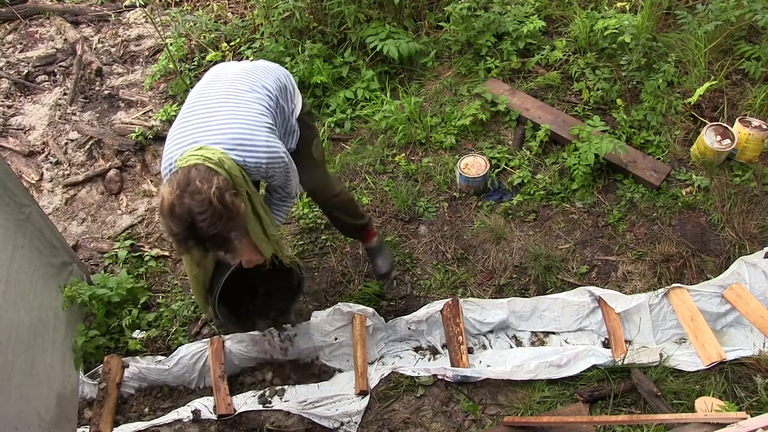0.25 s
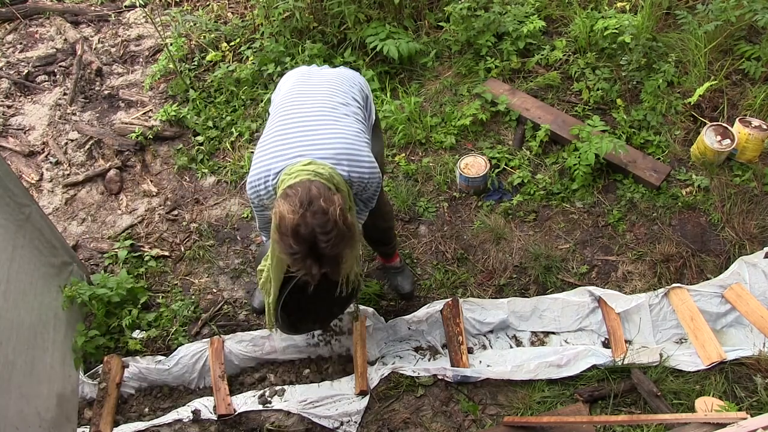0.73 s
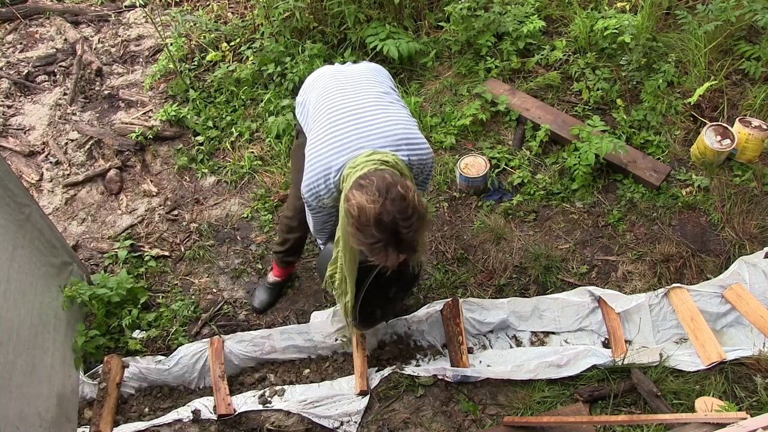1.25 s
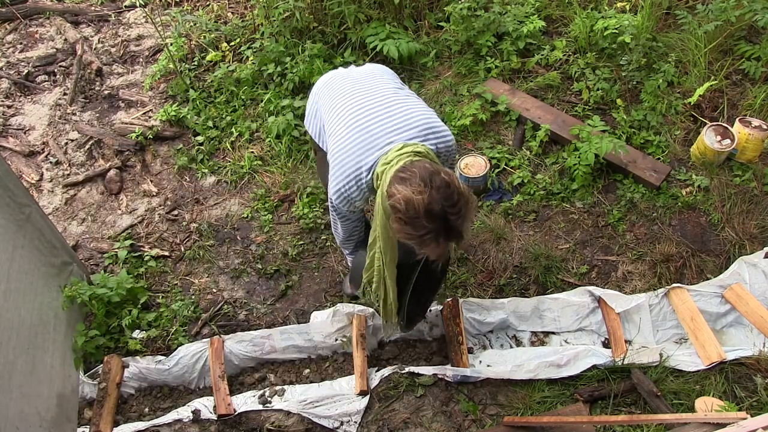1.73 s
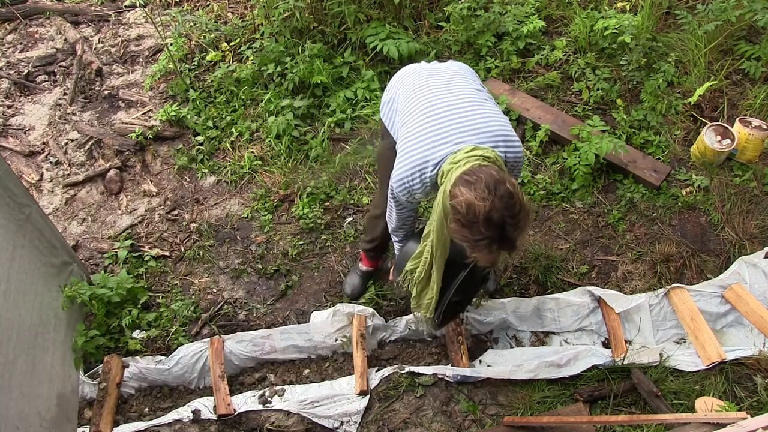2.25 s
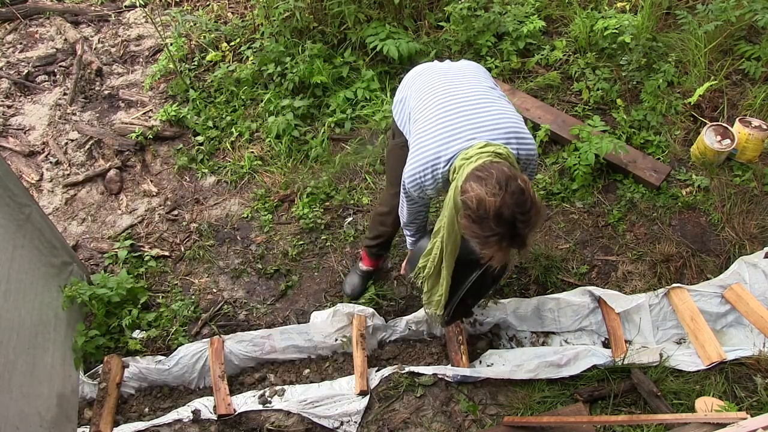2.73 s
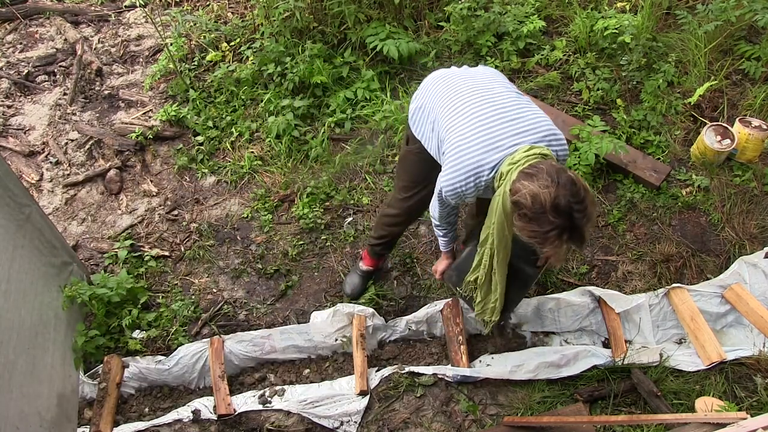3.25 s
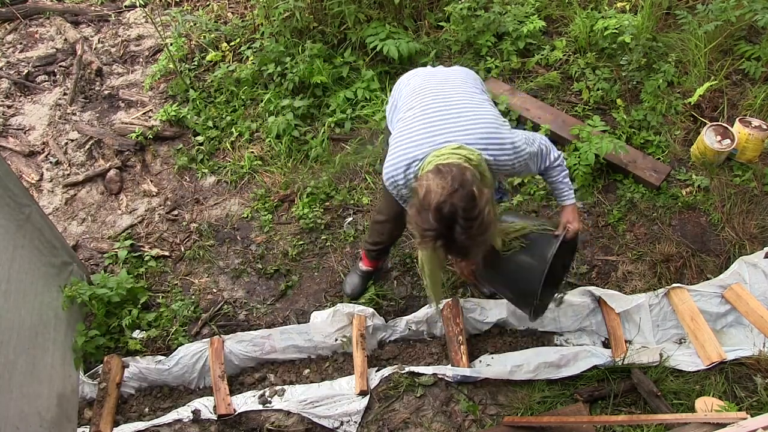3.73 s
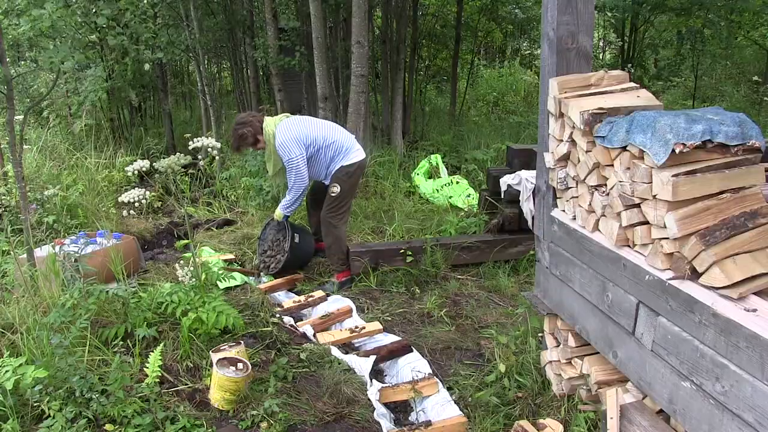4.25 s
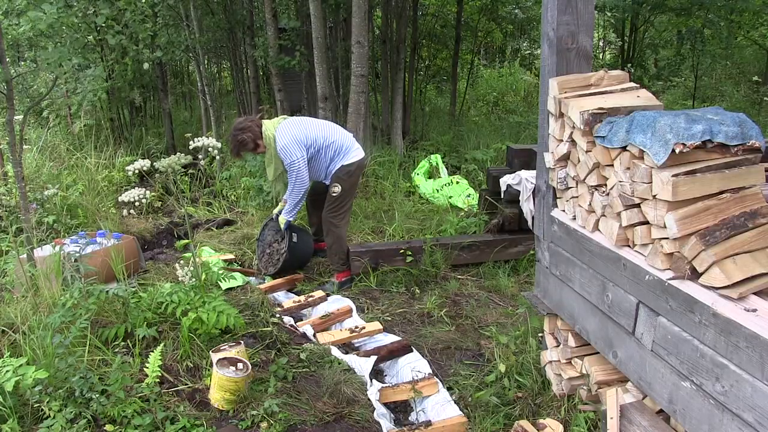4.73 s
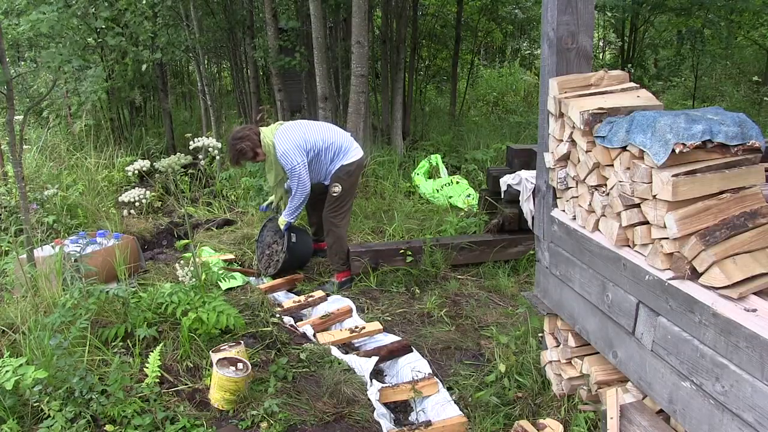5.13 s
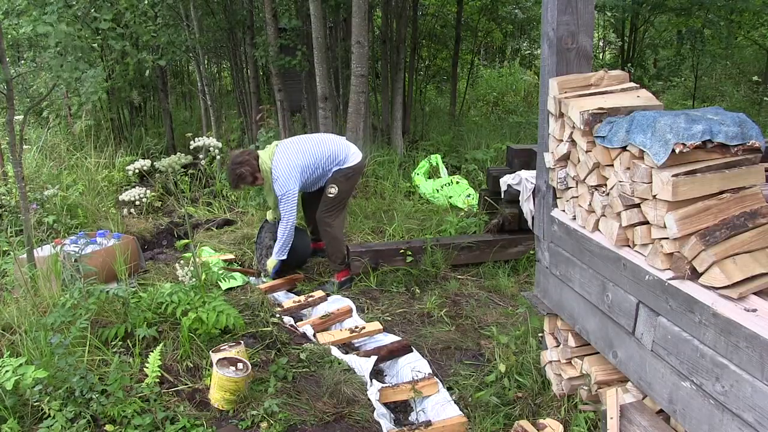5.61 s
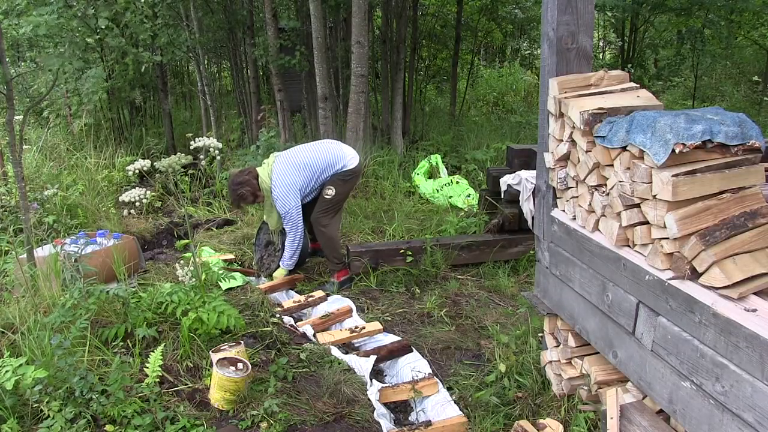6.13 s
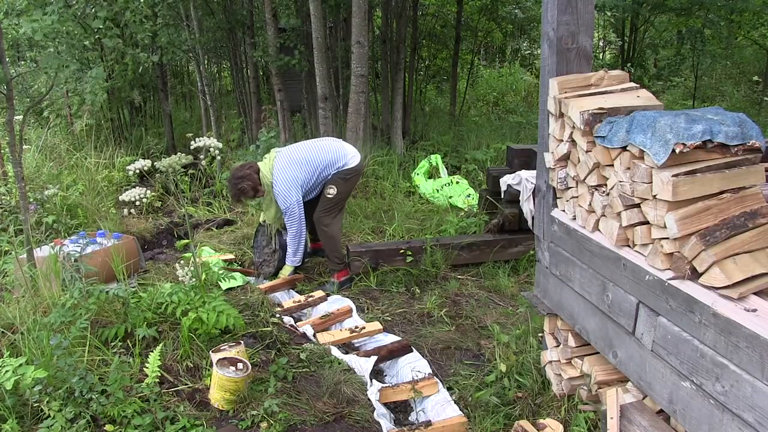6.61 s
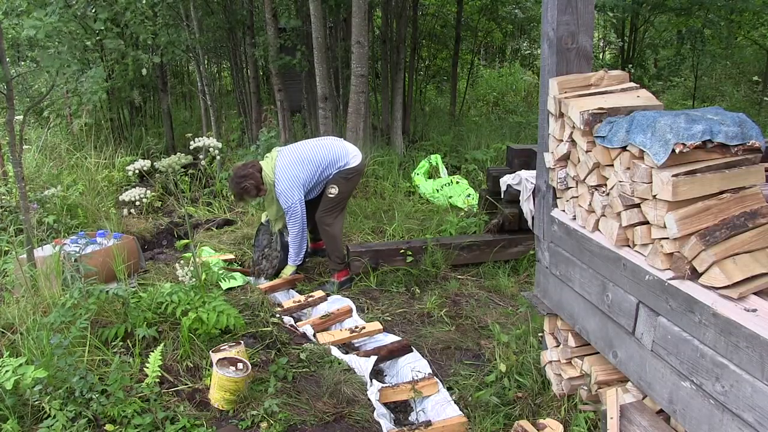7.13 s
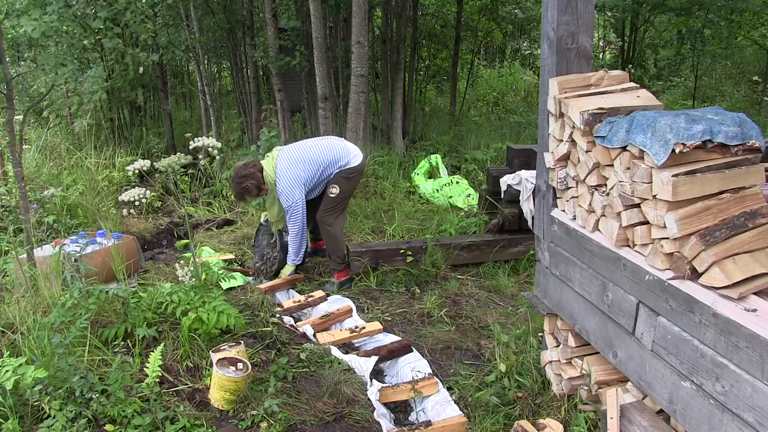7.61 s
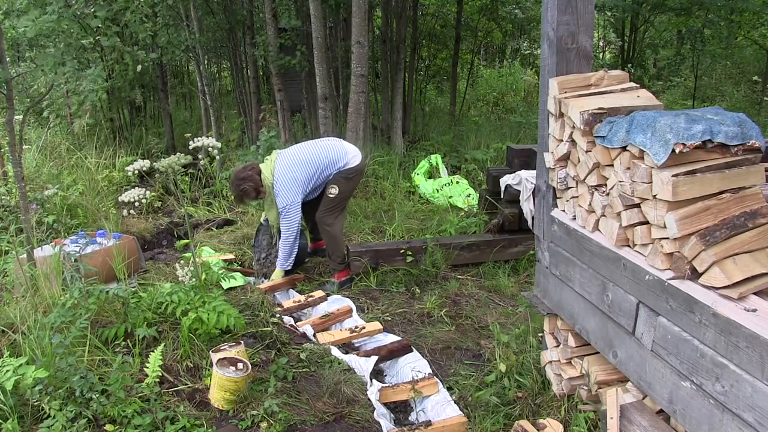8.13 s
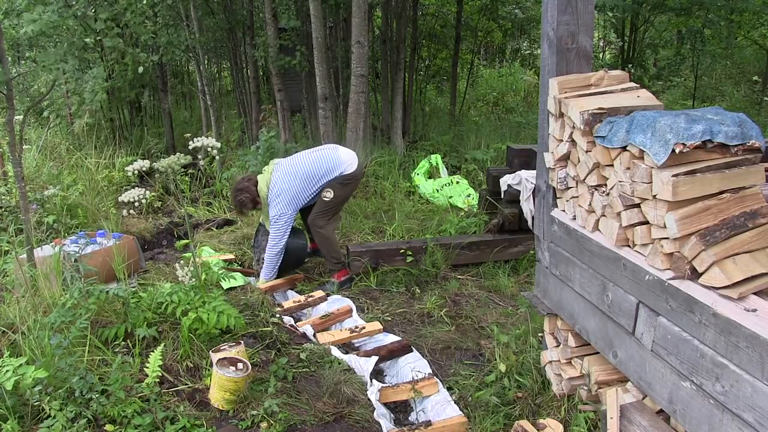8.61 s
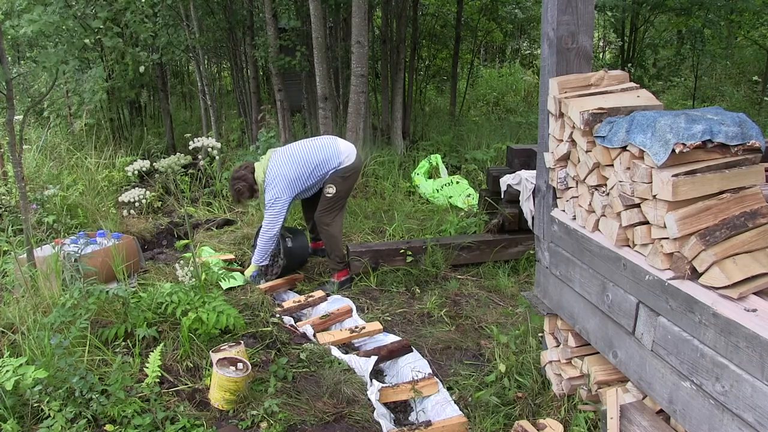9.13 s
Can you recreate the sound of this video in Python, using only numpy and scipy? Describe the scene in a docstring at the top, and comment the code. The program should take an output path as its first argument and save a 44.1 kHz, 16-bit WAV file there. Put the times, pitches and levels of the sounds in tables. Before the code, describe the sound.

Gritty rubble hisses from a bucket in quick surges with clacking stones, then knocks dully from across a windy garden, then sounds close again.

```python
"""Grit hisses out in surges while stones and brick lumps clack: rubble shaken from a bucket into a lined trench.
Heard from close above (bright), from across the garden (dull, knocking, windy), then close again.
Grit is noise and thousands of tiny damped sines under a surging level; stones are pitched rings with chatter
and a noise crack, soft lumps low thumps. Wind is shaped low noise; a thin treble hiss joins the last view."""
import sys
import numpy as np
from scipy import signal
from scipy.fft import rfft, irfft, next_fast_len
from scipy.io import wavfile
from scipy.ndimage import map_coordinates

SR = 44100
rng = np.random.default_rng(int(sys.argv[2]) if len(sys.argv) > 2 else 0)


def log_audio(samples):
    """Write samples as a 16-bit WAV file to the path given in sys.argv[1]."""
    # one column per channel
    frames = np.atleast_2d(samples).T
    # limit to full scale, then quantise
    limited = np.clip(frames, -1, 1)
    pcm = np.round(limited * 32767).astype(np.int16)
    wavfile.write(sys.argv[1], SR, pcm)


N = 413216


def amp(db):
    """Amplitude ratio of a level in dB."""
    return 10 ** (np.asarray(db) / 20)


def unit(x):
    """x scaled to rms 1."""
    return x / np.sqrt(np.mean(x ** 2) + 1e-20)


def along(points, hz):
    """Interpolate (frequency [Hz], value) points on a log frequency axis."""
    point_hz, value = np.transpose(points)
    return np.interp(np.log(hz + 1), np.log(point_hz + 1), value)


def curve(rows):
    """One value per sample from (time [s], value) rows."""
    return np.interp(np.arange(N) / SR, *np.transpose(rows))


def wobble(knots_per_s):
    """Smooth random curve through normally distributed knots."""
    knots = rng.standard_normal(N // 200)
    return map_coordinates(knots, [np.arange(N) * knots_per_s / SR])


def filtered(x, response):
    """x times a response of frequency [Hz]."""
    m = next_fast_len(N + SR // 2)
    return irfft(rfft(x, m) * response(np.fft.rfftfreq(m, 1 / SR)), m)[:N]


def coloured(x, points):
    """x shaped by (frequency [Hz], level [dB]) points, at rms 1."""
    return unit(filtered(x, lambda hz: amp(along(points, hz))))


def noise_decay(t60_s):
    """50 ms exponential envelope that falls 60 dB in t60_s."""
    return amp(-60 * np.arange(SR // 20) / SR / t60_s)


def by_view(near, far, last):
    """Each of the three places of listening has its own signal."""
    # the distant view: (start [s], end [s])
    far_view = (4.099, 8.585)
    t = np.arange(N) / SR
    return np.select([t < far_view[0], t < far_view[1]], [near, far], last)


def sizes(luck, spread_db):
    """Collision gains with exponentially distributed dB: most faint, a few stand out, capped at 16 dB."""
    return amp(np.minimum(-spread_db * np.log(1 - luck), 16))


def rings(start_s, hz, gain, cycles, size):
    """Damped sines of size samples, 60 dB down after their cycles; contact softens the onset."""
    hz = np.clip(hz, 100, SR / 2.5).reshape(-1, 1)
    turns = np.arange(size) / SR * hz
    decay = amp(-60 * turns / np.reshape(cycles, (-1, 1)))
    contact = 1 - np.exp(-turns / 0.42)
    wave = np.sin(2 * np.pi * turns) * decay * contact
    at = np.round(start_s * SR).astype(int).reshape(-1, 1) + np.arange(size)
    return np.bincount(at.ravel(), (gain.reshape(-1, 1) * wave).ravel(), N + SR)[:N]


def grains(count, low_hz, high_hz, cycles, spread_db, size):
    """Small collisions at random times and log-spread pitches; gain rises with pitch to flatten the spectrum."""
    when, pitch, luck = rng.random((count, 3)).T
    hz = low_hz * (high_hz / low_hz) ** pitch
    return unit(rings(when * N / SR, hz, hz * sizes(luck, spread_db), cycles, size))


def ticks(count, spread_db, t60_s):
    """Gain of rms 1 that jumps at random moments and dies away: pebbles striking inside the stream."""
    when, luck = rng.random((count, 2)).T
    blows = np.bincount((when * N).astype(int), sizes(luck, spread_db), N)
    return unit(signal.fftconvolve(blows, noise_decay(t60_s))[:N])


def scattered(x, t60_s, db):
    """Trench walls and rubble smear each click into a short noisy tail, one of eight random ones in turn."""
    size = SR // 8
    tails = amp(-60 * np.arange(size) / SR / t60_s) * rng.standard_normal((8, size))
    tails = tails / np.linalg.norm(tails[0])
    # the tail is switched sixteen times a second in fixed rotation
    active = np.arange(N) // (SR // 16) % len(tails) == np.arange(len(tails))[:, None]
    smear = signal.fftconvolve(x * active, tails, axes=1)[:, :N].sum(axis=0)
    return x + amp(db) * smear


def treble_hiss():
    """Thin steady noise, high-passed near 7 kHz and falling above, under the last close view."""
    hiss = unit(filtered(rng.standard_normal(N), lambda hz: hz ** 6 / (hz ** 6 + 7000 ** 6) / hz.clip(1)))
    return by_view(0, 0, amp(-36.5) * hiss)


def wind():
    """Low lumpy buffeting on the microphone: noise of wandering level, higher in pitch at the close views."""
    # buffeting: (time [s], level [dB])
    buffeting = [(0, -29.5), (.6, -39.5), (1.4, -61), (3.4, -54), (4.3, -42), (4.75, -23.5), (5.1, -37),
                 (5.5, -41), (5.9, -25), (6.2, -39), (7, -27), (7.5, -38), (7.8, -23.5), (8.1, -22),
                 (8.5, -25.5), (9, -30), (9.37, -44)]
    # spectra from close and from afar: (frequency [Hz], level [dB])
    rumble_near = [(15, 6), (40, -1.5), (100, 5), (160, 2), (250, -7), (550, -48), (1000, -120)]
    rumble_far = [(15, 2), (35, 3), (60, -3), (110, -9), (220, -39), (450, -49), (1000, -120)]
    noise = amp(3.5 * wobble(knots_per_s=9)) * rng.standard_normal(N)
    near, far = coloured(noise, rumble_near), coloured(noise, rumble_far)
    return amp(curve(buffeting)) * by_view(near, far, near)


def pour_power():
    """Power of the falling grit: a trickle plus a slug at each jerk of bucket or hand."""
    # trickle: (time [s], level [dB])
    flow = [(0, -24.5), (.45, -23.5), (1.0, -20.5), (1.25, -25), (1.78, -23), (1.9, -36), (2.2, -22.5),
            (3.03, -25), (3.3, -13), (3.46, -23.5), (3.66, -21), (3.77, -37.5), (4.098, -41.5),
            (4.1, -19.5), (4.28, -22.5), (4.43, -18.5), (4.85, -24), (5.3, -34.5), (5.9, -26.5),
            (6.8, -20.5), (7.8, -21), (8.0, -26.5), (8.78, -36), (8.97, -22), (9.25, -19.5), (9.37, -28.5)]
    # slugs: (time [s], level [dB])
    surges = [(0.038, -13), (0.115, -12), (0.175, -17.5), (0.242, -20), (0.305, -24.5), (0.373, -17),
              (0.43, -19), (0.515, -18), (0.588, -17.5), (0.653, -16.5), (0.715, -16.5), (0.772, -14),
              (0.833, -17), (0.901, -16), (0.975, -13.5), (1.029, -12.5), (1.093, -11.5), (1.161, -17.5),
              (1.285, -14), (1.354, -13), (1.418, -8.5), (1.471, -15.5), (1.607, -18), (1.674, -15),
              (1.784, -22), (1.935, -15.5), (2.005, -19.5), (2.077, -22), (2.135, -13.5), (2.204, -15.5),
              (2.262, -18.5), (2.328, -21), (2.394, -14), (2.458, -15), (2.53, -15), (2.575, -17),
              (2.605, -14.5), (2.666, -15.5), (2.731, -19), (2.807, -11.5), (2.864, -16.5), (2.906, -17),
              (2.94, -17), (3.117, -19), (3.181, -27), (3.235, -19.5), (3.304, -16), (4.79, -20),
              (6.112, -15.5), (6.451, -12.5), (6.845, -15.5), (7.27, -19.5), (7.42, -17), (7.716, -17),
              (7.745, -15.5), (7.88, -15.5), (8.921, -19), (8.962, -16.5), (8.987, -16), (9.032, -16),
              (9.151, -19.5), (9.254, -15.5)]
    # slugs last longer while the first bucket is full: (time [s], length factor [1])
    full_bucket = [(1.1, 1.92), (1.4, 1.13)]
    rise_s, fall_s = 0.0074, .011  # times the length factor
    t = np.arange(N) / SR
    power = amp(2 * curve(flow))
    for s, db in surges:
        at = slice(max(round((s - .15) * SR), 0), round((s + .25) * SR))
        length = np.interp(s, *np.transpose(full_bucket))
        u = (t[at] - s) / np.where(t[at] < s, rise_s, fall_s) / length
        power[at] += amp(2 * db) * np.exp(-u ** 2)
    return power


def grit_stream():
    """Colliding grains, dust noise and pebble strikes, coloured by the place of listening."""
    # spectra on the liner from close, in the bucket from afar, in the last view: (frequency [Hz], level [dB])
    near_colour = [(59, -54), (100, -17), (202, -9), (330, -8.5), (742, 0.5), (1630, -3), (2020, 1.5),
                   (5050, 2), (9580, 2.5), (15000, -5), (16300, -43)]
    far_colour = [(59, -50), (100, -8), (160, -1.5), (267, 0), (408, -11), (539, -3.5), (711, -5),
                  (1190, -4), (2150, -9), (3300, -5), (12600, -26.5), (16300, -45)]
    last_colour = [(88, -59), (150, -15.5), (298, -12), (693, -2), (1200, -10), (2040, -3.5), (8540, -9),
                   (16300, -23)]
    fine = grains(count=16000, low_hz=1500, high_hz=16500, cycles=12, spread_db=3.5, size=200)
    coarse = grains(count=3500, low_hz=199.0, high_hz=2520, cycles=19.0, spread_db=5.0, size=640)
    dust = rng.standard_normal(N)
    clumps = amp(1.53 * wobble(knots_per_s=40))  # grains come in bunches
    strikes = ticks(count=1400, spread_db=2.5, t60_s=0.016) * rng.standard_normal(N)
    near = clumps * (fine + 0.29 * coarse + 1.55 * dust + 1.71 * strikes)
    far = clumps * (fine + 0.46 * coarse + 1.15 * dust + 1.49 * strikes)
    return by_view(coloured(near, near_colour), coloured(far, far_colour), coloured(near, last_colour))


def narrow_band_rings():
    """Short rings crowded into one narrow band: gravel scrape, then a faint 700-900 Hz murmur around 4 s."""
    # (time [s], lowest pitch until the next row [Hz], level over the grit, interpolated [dB])
    band = [(0, 2100, -40), (1.3, 2090, -19), (3.05, 2610, -6.5), (3.8, 710, -7.5), (4.1, 840, -5.5),
            (4.3, 3280, -7), (8.585, 624, -20)]
    row_s, row_hz, row_db = np.transpose(band)
    when, pitch, luck = rng.random((5000, 3)).T
    start_s = when * N / SR
    hz = row_hz[np.searchsorted(row_s, start_s) - 1] * (0.976 + .22 * pitch)
    ringing = unit(rings(start_s, hz, sizes(luck, spread_db=2.5), cycles=12.6, size=400))
    return amp(curve(np.c_[row_s, row_db])) * ringing


def grit():
    """Stream, narrow-band rings and thin bright ticks of splintering edges share one surging level."""
    chips = amp(-18.5) * grains(count=700, low_hz=3460, high_hz=14800, cycles=7, spread_db=2.0, size=150)
    return np.sqrt(pour_power()) * (chips + grit_stream() + narrow_band_rings())


def thumps():
    """Soft lumps landing on earth or heap: low rings damped within a few cycles."""
    # (time [s], level [dB], pitch [Hz])
    soft_lumps = [(1.957, -14.5, 190), (5.158, 1.5, 287), (6.651, 1, 260), (6.669, 1, 246),
                  (6.834, -5, 270), (7.15, 7, 232), (8.097, -16, 230)]
    s, db, hz = np.transpose(soft_lumps)
    return rings(s, hz, amp(db), cycles=5.2, size=2500)


def clacks():
    """Each hard lump rings briefly at its own pitch, chatters on its rough faces and cracks."""
    # stones and brick lumps: (time [s], level [dB], ring pitch [Hz])
    lumps = [(0.644, -6, 3740), (0.678, -7.5, 2900), (0.765, -8, 5160), (1.344, -10, 2080),
             (1.358, -4, 2150), (1.467, -11, 7200), (1.534, -6, 9300), (1.677, -6, 2120),
             (1.741, -4.5, 5250), (1.899, -17.5, 9000), (2.042, -6, 5340), (2.057, -12, 5100),
             (2.076, -7, 5240), (2.165, -4.5, 5240), (2.383, -15, 3000), (2.847, -9, 3360),
             (2.9, -10, 3760), (2.973, -8.5, 8700), (3.715, -18, 4470), (3.784, -18.5, 9300),
             (3.961, -9.5, 1880), (4.009, -8.5, 7640), (4.101, -9, 1000), (4.146, -8, 830),
             (4.22, -4.5, 890), (4.355, -5.5, 830), (4.418, -3.5, 880), (4.443, -3, 3980),
             (4.52, -6.5, 3940), (4.726, 0.5, 3310), (4.842, -6, 7440), (5.083, -16, 2090),
             (5.156, -4.5, 804), (5.168, -5.5, 800), (5.22, -27, 2500), (5.499, -18, 3270),
             (5.575, -16, 706), (5.585, -12, 3300), (5.623, -22, 2530), (5.855, -11, 1160),
             (5.953, -3, 560), (6.019, -5.5, 3180), (6.037, -3, 905), (6.081, -5, 3270),
             (6.188, -6.5, 1900), (6.213, -1, 1146), (6.266, -8, 1500), (6.328, 0.5, 573),
             (6.37, -10, 1300), (6.398, -2.5, 1086), (6.444, -17, 3000), (6.629, -2, 553),
             (6.674, -2, 1160), (6.696, -6, 1000), (6.721, -10.5, 1260), (6.78, 0, 643), (6.815, -6, 3770),
             (6.864, -6, 1030), (6.89, -7.5, 2900), (6.902, -2.5, 630), (6.951, -7, 1410),
             (6.993, -2.5, 1320), (7.033, -9, 626), (7.065, -12, 1410), (7.081, -3.5, 1290),
             (7.127, -7, 970), (7.142, -2, 557), (7.16, -1.5, 1220), (7.252, -12, 1030), (7.347, -10, 619),
             (7.38, -8.5, 3420), (7.618, -5.5, 2540), (7.646, -7.5, 800), (7.71, -6.5, 3600),
             (7.807, -4.5, 1260), (7.979, -13, 645), (8.0, -8, 636), (8.08, -13.5, 2690),
             (8.093, -7.5, 584), (8.201, -2.5, 660), (8.262, -7.5, 3440), (8.354, -4.5, 3150),
             (8.455, -9.5, 1470), (8.485, -6.5, 565), (8.56, -10, 590)]
    s, db, hz = np.transpose(lumps)
    # small hard stones ring through more cycles than crumbly brick
    ring = rings(s, hz, amp(db), 8 + 11 * hz / 1000, size=1500)

    # further touches crowd the first milliseconds, weaker and at scattered pitches
    wait, pitch = rng.random((len(s), 2, 14)).transpose(1, 0, 2)
    late_s = .012 * wait ** 2
    spread_octaves = np.clip(3.8 - 0.685 * hz / 1000, .3, 4)[:, None]  # big lumps broad, pebbles narrow
    touch_hz = hz[:, None] * 2 ** (spread_octaves * (pitch - .4))
    touch_gain = amp(db[:, None] - 6.5 - 330 * late_s)
    chatter = rings(s[:, None] + late_s, touch_hz, touch_gain, 5 + 6 * touch_hz / 1000, size=800)

    # smaller, harder stones crack more: 6.5 dB per octave of pitch
    crack_db = -13 + 6.5 * np.log2(hz / 1000)
    blows = np.bincount(np.round(s * SR).astype(int), amp(db + crack_db), N)
    burst = signal.fftconvolve(blows, amp(-7.5) * noise_decay(t60_s=0.02))[:N]
    crack = filtered(burst * rng.standard_normal(N), lambda f: f / (f + 1500) / (1 + (f / 9000) ** 2) ** .5)
    return ring + chatter + crack


def scene():
    """Grit and lumps, smeared and high-passed near 110 Hz, over wind and hiss."""
    rubble = scattered(grit(), t60_s=0.073, db=-10) + scattered(clacks() + thumps(), t60_s=0.21, db=-11)
    rubble = filtered(rubble, lambda hz: hz ** 4 / (hz ** 4 + 110 ** 4))
    return (rubble + wind() + treble_hiss())[None]


def record(dry):
    """Peaks flatten near full scale; nothing is kept above the band limit."""
    top_hz = 16450
    held = dry[0] / (1 + np.abs(dry[0] / .9) ** 6) ** (1 / 6)
    return filtered(held, lambda hz: hz < top_hz)[None]


dry = scene()
out = record(dry)
log_audio(out)
```